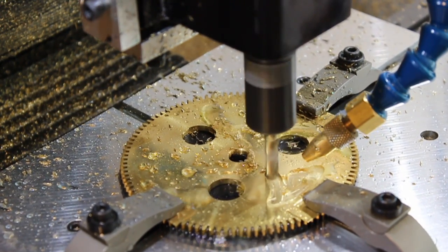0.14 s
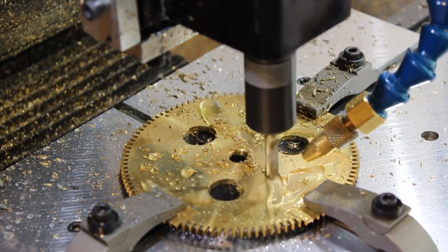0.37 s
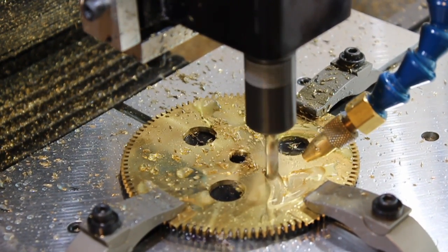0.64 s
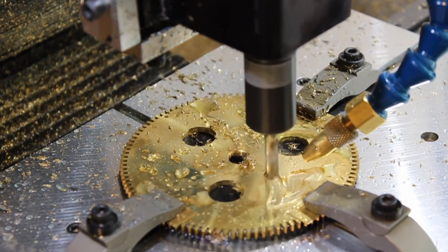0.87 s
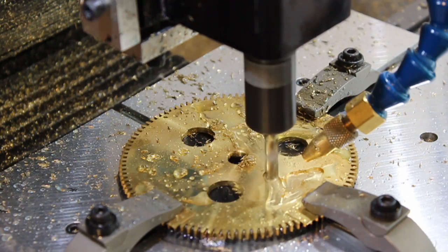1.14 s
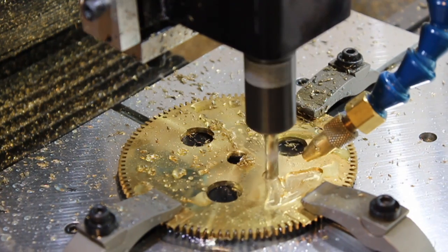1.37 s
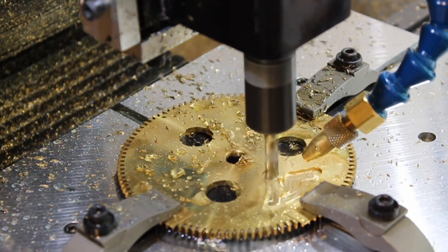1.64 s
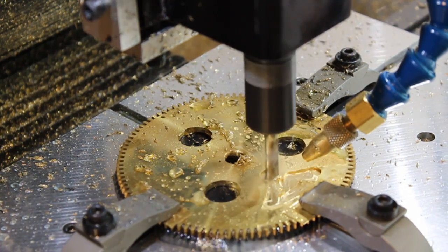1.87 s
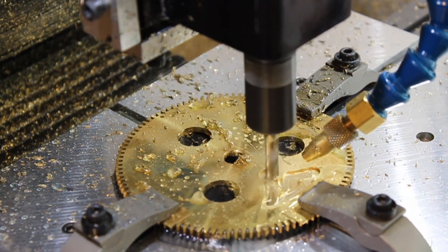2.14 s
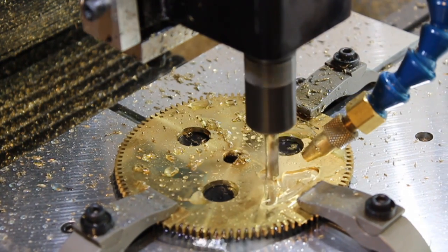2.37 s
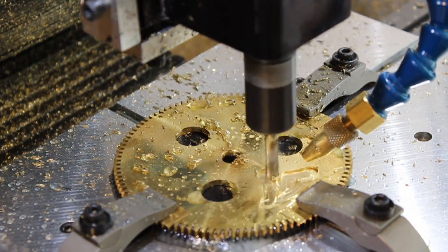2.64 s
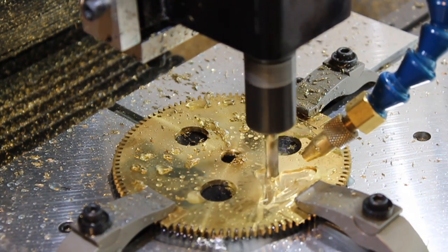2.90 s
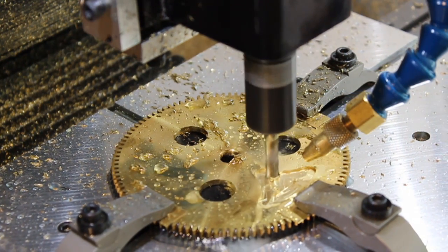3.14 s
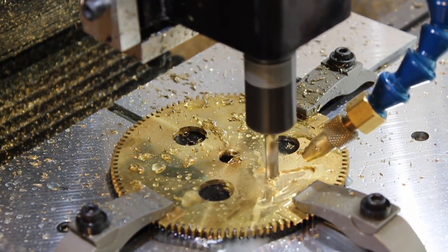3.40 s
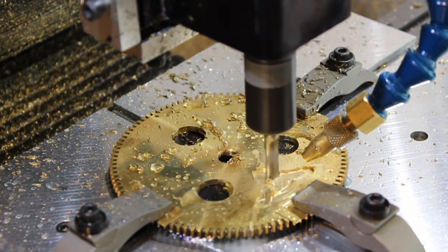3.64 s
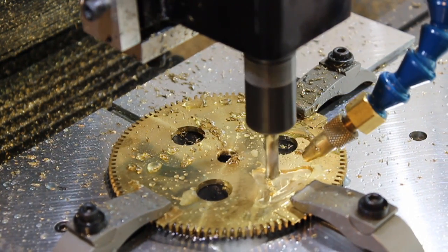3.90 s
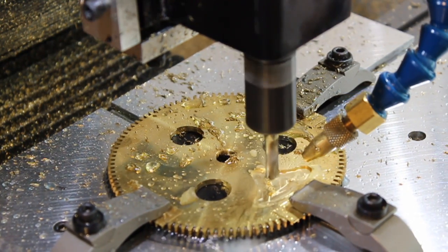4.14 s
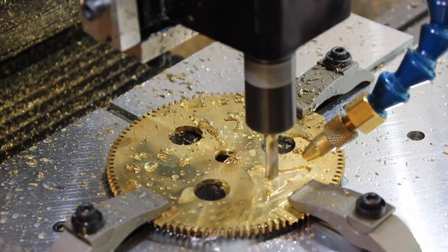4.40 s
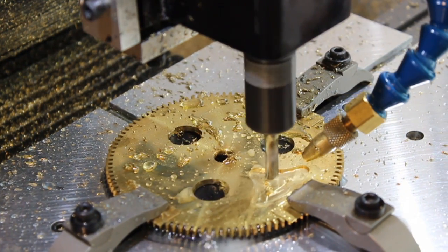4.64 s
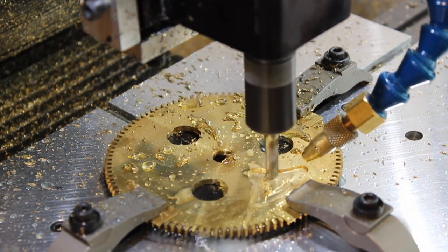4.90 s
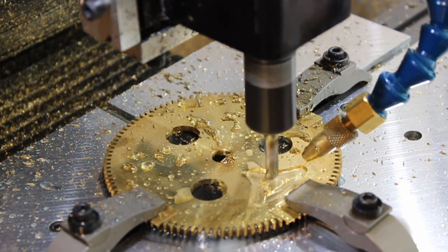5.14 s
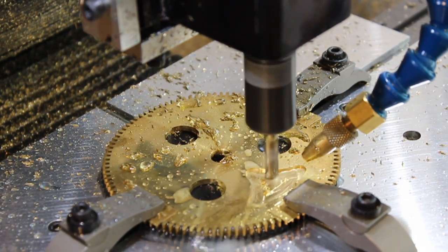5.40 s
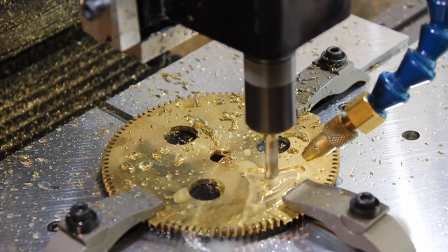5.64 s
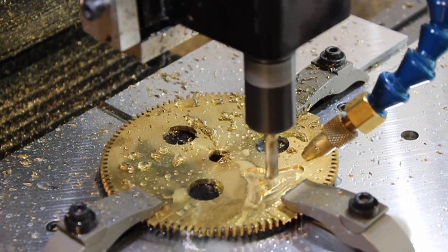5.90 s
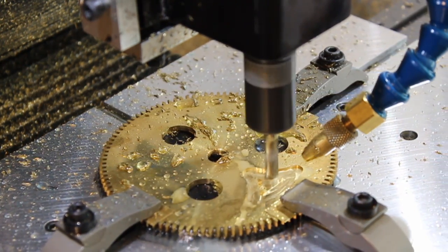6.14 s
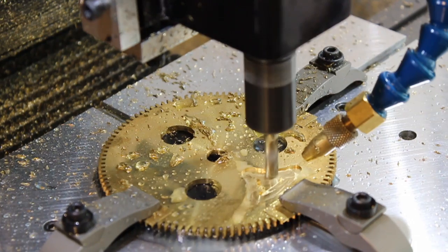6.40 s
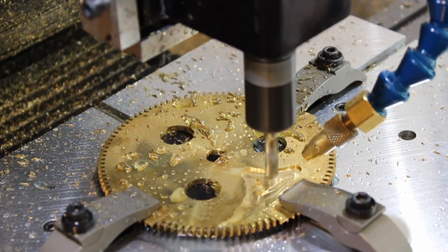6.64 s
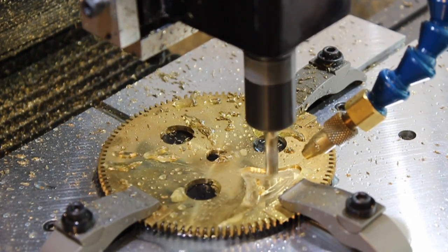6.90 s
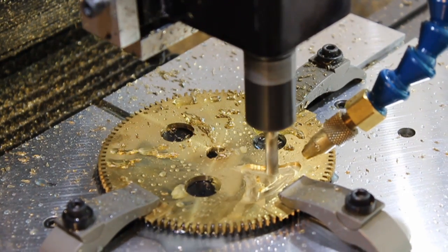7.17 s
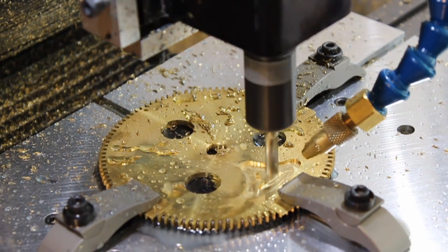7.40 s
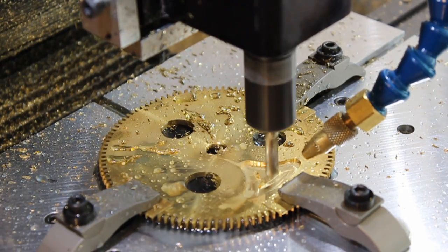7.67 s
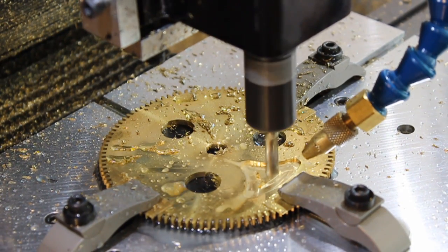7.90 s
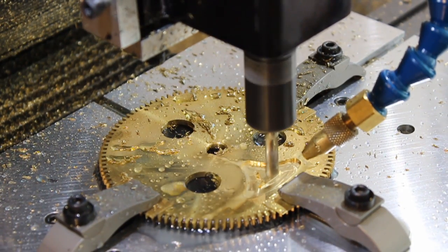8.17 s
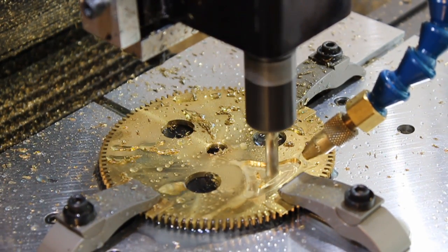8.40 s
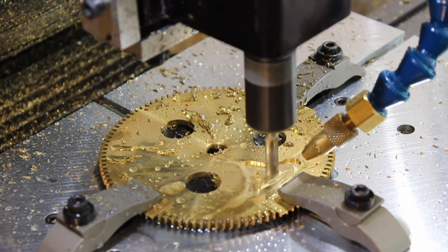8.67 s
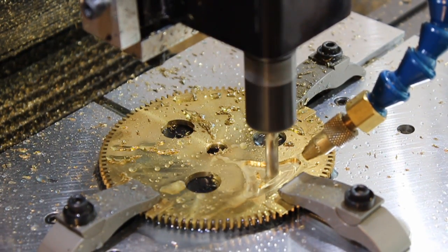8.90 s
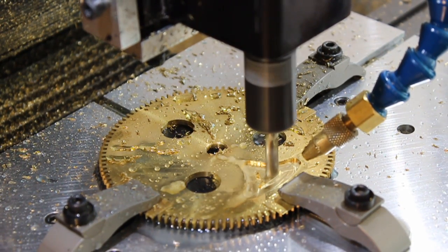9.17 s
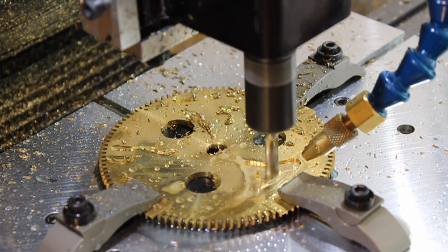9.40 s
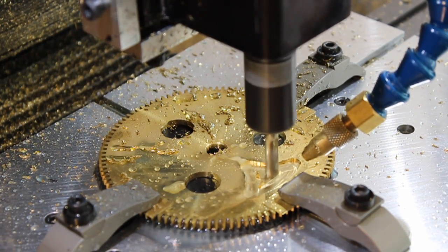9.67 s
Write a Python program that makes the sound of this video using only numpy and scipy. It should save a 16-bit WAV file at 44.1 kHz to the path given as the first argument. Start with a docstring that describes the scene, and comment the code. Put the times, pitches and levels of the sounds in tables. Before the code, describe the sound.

A strong, bright air jet hisses constantly close to the microphone, finely fluttered by a spinning cutter. Under it the cutter drums rapidly on brass, bites harder early on, then weakens while thin feed-motor whines sing. Cutting fades past the middle; short electronic-sounding motor chirps follow, then a faint low steady tone. Compressor hum and workshop rumble remain throughout, mono with slight small-room reflections.

```python
"""A four-flute end mill cuts a clamped brass wheel close to a mono microphone, in a hissing air jet chopped by
the flutes and coloured by clamps and plate; a compressor throbs and the workshop rumbles throughout. The tool
enters solid metal at 0.64 s and each flute's blow drums on the machine frame. From 2.95 s two feed motors whine
along an arc while the cut weakens, fading out by 6.6 s; short feed moves chirp from 6.55 s, and from 7.7 s a
slow steady creep sings under the jet. Motors and compressor are sines, jet and rumble are shaped noise."""
import sys
import numpy as np
from scipy import signal
from scipy.fft import rfft, irfft, next_fast_len
from scipy.io import wavfile
from scipy.ndimage import uniform_filter1d, map_coordinates

SR = 44100
rng = np.random.default_rng(int(sys.argv[2]) if len(sys.argv) > 2 else 0)


def voltage_ratio(decibels):
    """Convert decibels (scalar or array-like) to amplitude ratios, 20 dB per decade."""
    exponent = np.asarray(decibels, float) / 20
    return 10 ** exponent


def output_pcm(signal):
    """Save a mono or channel-first signal as 16-bit PCM at the path in sys.argv[1].

    Samples are clipped to [-1, 1] before scaling.
    """
    pcm = np.clip(np.atleast_2d(signal).T, -1, 1) * 32767
    wavfile.write(sys.argv[1], SR, np.round(pcm).astype(np.int16))


N = 431717
TIME = np.arange(N) / SR

# background rumble, relative spectrum: frequency_hz, density_db_per_hz
RUMBLE_COLOUR = [(25, -26), (50, -20), (90, -2), (160, -4), (300, -3.5), (600, -4.5), (1000, 1.5),
                 (1400, 0.5), (2000, -0.5), (3000, -14.5)]
# background rumble over time: time_s, level_db
RUMBLE_LEVEL = [(0, -42.5), (5.8, -44), (6.4, -46), (7.2, -42), (8.6, -43), (9.79, -43.5)]
# compressor overtones: multiple_of_stroke_rate, level_db
COMPRESSOR_OVERTONES = [(2, -59.0), (3, -72.0), (4, -66.0), (5, -73.0), (6, -62.0), (7, -77.0), (8, -61.0),
                        (9, -66.0), (10, -62.0), (11, -61.0), (12, -55.0), (13, -58.0), (14, -68.0),
                        (15, -66.0), (16, -71.0), (17, -62.0), (18, -58.0), (19, -68.0), (20, -65.0),
                        (21, -73.0), (22, -74.0), (23, -75.0), (24, -63.0), (25, -71.0), (26, -59.0),
                        (27, -67.0), (28, -52.0), (29, -53.0), (30, -62.0), (31, -61.0), (32, -47.0),
                        (33, -62.0), (34, -65.0), (35, -65.0), (36, -64.0), (37, -62.0), (38, -62.0),
                        (39, -59.0), (40, -55.0), (41, -64.0), (42, -62.0), (43, -62.0), (44, -61.0),
                        (45, -57.0), (46, -56.0), (47, -53.0), (48, -73.0), (49, -64.0), (50, -61.0),
                        (51, -71.0), (52, -59.0), (53, -57.0), (54, -61.0), (55, -65.0), (61, -61.0),
                        (64, -62.0)]
# mains hum: frequency_hz, level_db
MAINS_HUM = [(240, -64.5), (360, -63), (599.5, -60)]
# short feed moves at even acceleration, before the slides ring:
# start_s, length_s, from_step_rate_hz, to_step_rate_hz, level_db
FEED_MOVES = [(6.555, .055, 230, 280, -44), (6.615, .055, 1080, 1400, -43), (6.765, .05, 1320, 1060, -42),
              (6.915, .13, 250, 1260, -42), (7.15, .06, 230, 280, -43), (7.22, .07, 590, 615, -52),
              (7.455, .18, 1300, 40, -43), (7.655, .04, 1050, 1300, -45)]
# spindle, slowed by heavy cuts: time_s, speed_turns_per_s, chop_share (of the jet, by each flute, 0-1)
SPINDLE_RUN = [(0, 31.99, .07), (.6, 31.97, .08), (.85, 31.58, .1), (1.3, 31.92, .14), (1.75, 32.18, .17),
               (2.1, 32.15, .18), (2.65, 31.9, .18), (2.95, 31.65, .15), (3.3, 32.36, .19), (3.6, 32.5, .2),
               (5.05, 32.64, .2), (6.25, 32.74, .17), (7.3, 32.78, .12), (9.79, 32.86, .12)]
# the cut, relative levels: time_s, force_db, low_modes_db, high_modes_db
CUT_FORCE = [(0, -43.5, -9, 0.5), (.61, -45, -4, 1), (.68, -38.5, -2, 1), (.9, -42, 6, 2.5),
             (1.27, -42, 3, -1.5), (1.36, -43.5, -7, 7), (1.47, -43, -3, 4), (1.6, -44.5, -3, -1.5),
             (1.95, -46, -4, 3.5), (2.25, -45, -4, 3), (2.37, -43, -8, 2), (2.6, -44, -5.5, 2),
             (2.9, -40.5, 0, -0.5), (3.3, -45, -2, 2), (3.45, -51.5, 4, 3.5), (4.4, -49.5, -2.5, -2.5),
             (5.7, -57, 6, 1), (6.6, -90, 0, 0)]
# machine frame modes, relative levels: frequency_hz, width_hz, level_db
FRAME_MODES = [(98, 41, -14), (152.5, 36, -3.5), (188, 25, -4.5), (226.7, 23, -1.5), (254.4, 30, 0),
               (297, 38, 0.5), (490, 75, -4.5), (608, 43, -3.5), (686, 53, -2), (825, 46, -4.5),
               (1109, 58, -9), (1452, 58, -9.5)]
# air jet, relative levels: time_s, hiss_db, low_hiss_db (only its departure from its mean counts)
JET_FLOW = [(0.0, -20, -10.5), (0.11, -18.5, -10), (0.22, -19.5, -12), (0.24, -22, -11.5),
            (0.35, -19, -10.5), (1.09, -20, -11.5), (2.78, -19, -13), (4.77, -20, -12), (6.54, -19, -13.5),
            (6.71, -21, -11), (6.84, -20.5, -10), (7.09, -21, -11), (8.59, -19, -11.5), (8.61, -20.5, -13),
            (8.7, -19.5, -12), (9.76, -19.5, -13), (9.79, -18.5, -11)]
# nozzle hiss, relative spectrum: frequency_hz, density_db_per_hz
NOZZLE_COLOUR = [(300, -50), (900, -32), (1600, -23), (2500, -14.5), (4000, -11), (6500, -10), (9000, -7),
                 (11500, -.5), (13500, -4.5), (15700, -3)]
# reflections off clamps and plate lift or cancel bands of the jet:
# centre_hz, width_hz, first_position_db, second_position_db, third_position_db
FIXTURE_BANDS = [(2780, 270, -2.8, -3.1, -1.4), (3230, 460, -2.7, -1.5, 0.6), (3610, 300, 2.7, 1.9, 2.2),
                 (4340, 290, -3.4, -4.2, -1.5), (5090, 420, -0.4, -2.7, -1.3), (5450, 200, 0, 1, 3),
                 (5720, 210, 1.9, 0.7, -1.6), (6220, 220, 4.1, 4.1, 5.6), (6480, 370, 4.9, 3.2, 6.0),
                 (6710, 260, -3.0, -4.0, -3.8), (7220, 240, 1.1, -2.6, -2.9), (7460, 410, -3.8, 1.6, 5.4),
                 (8080, 350, 3.1, 4.1, 5.0), (8490, 350, 2.1, 1.5, 5.8), (8690, 180, -4.6, -4.1, -2.6),
                 (9050, 540, 2.9, 4.7, 5.5), (9540, 260, -1.6, -3.0, -1.5), (9890, 700, 3.3, 4.3, 6.2),
                 (10140, 240, -5.1, -4.6, -4.7), (10450, 160, 1, 1, 2), (10880, 290, 1.8, 1.5, 0.1),
                 (11280, 210, -1.9, -1.5, -6.6), (11690, 360, -0.9, -0.5, -7.0),
                 (12250, 370, 1.1, -1.5, -3.6), (12630, 700, -3.2, -2.7, 0.6), (13240, 520, 2.0, 0.9, 1.9),
                 (13730, 390, -3.1, 0.3, -1.9), (14600, 320, -3.4, -2.1, 1.4), (14780, 190, 2.2, 2.9, 1.3),
                 (15270, 300, 0, 1.5, 1.5)]
# when the table stands in each of those positions: time_s
TABLE_POSITIONS = [1.2, 4.8, 8.7]


def unit(x):
    """Scaled to rms 1."""
    return x / np.sqrt(np.mean(x ** 2) + 1e-20)


def curves(rows):
    """One value per sample for each column after the time."""
    time_s, *columns = np.transpose(rows)
    return [np.interp(TIME, time_s, column) for column in columns]


def wobble(rate):
    """A smooth random curve, rate knots a second."""
    knots = rng.standard_normal(int(N * rate / SR) + 4)
    return map_coordinates(knots, [TIME * rate])


def on_log_axis(points, hz):
    """(Hz, value) points joined on a log-frequency axis."""
    point_hz, values = np.transpose(points)
    return np.interp(np.log(hz + 1), np.log(point_hz), values)


def resonance(x, hz, width):
    """One damped mode, gain 1 at its centre."""
    return signal.lfilter(*signal.iirpeak(hz, hz / max(width, 5), SR), x)


def workshop():
    """Rumble of the room and the machine's bearings: noise with a shaped spectrum and a wavering level."""
    size = next_fast_len(N)
    colour = voltage_ratio(on_log_axis(RUMBLE_COLOUR, np.fft.rfftfreq(size, 1 / SR)))
    rumble = irfft(rfft(rng.standard_normal(size)) * colour, size)[:N]
    level_db = curves(RUMBLE_LEVEL)[0] + 0.87 * wobble(2.29)
    return voltage_ratio(level_db) * unit(rumble)


def hum():
    """The compressor sounds exact multiples of its stroke rate, each wavering a little, beside mains hum."""
    stroke_hz = 28.3045
    lines = [(multiple * stroke_hz, db) for multiple, db in COMPRESSOR_OVERTONES] + MAINS_HUM
    step = 64  # samples that share one gain
    slow_s = np.arange(0, N + step, step) / SR
    out = np.zeros(N)
    for hz, db in lines:
        waver = map_coordinates(rng.standard_normal(size=40), [slow_s * 3], order=3)
        gain = np.repeat(voltage_ratio(db + .8 * waver), step)[:N]
        out += np.sqrt(2) * gain * np.sin(2 * np.pi * (hz * TIME + rng.random()))
    return out


def whine(start, end, hz, db):
    """A motor sings a sine at its step rate hz between two times."""
    fade_s = min(.15, .2 * (end - start))
    span = (TIME > start) & (TIME < end)
    t = TIME[span]
    fade = np.clip(np.minimum(t - start, end - t) / fade_s, 0, 1)
    turns = np.cumsum((hz * np.ones(N))[span]) / SR
    out = np.zeros(N)
    out[span] = np.sqrt(2) * fade * voltage_ratio(db) * np.sin(2 * np.pi * turns)
    return out


def slide_ring(x, hz, width, db):
    """The slides ring with the steps in one damped mode."""
    return voltage_ratio(db) * resonance(x, hz, width)


def feed_motors():
    """Arc, short moves and creep sing at their step rates; the sine axis and the moves ring the slides."""
    start_s, end_s = 2.95, 6.55
    path_hz = 1177  # step rate along the arc
    angle = .471 + .0815 * (TIME - start_s)  # rad, turning in rad per s
    cosine_axis = whine(start_s, end_s, path_hz * np.cos(angle), db=-50.5)
    sine_axis = whine(start_s, end_s, path_hz * np.sin(angle), db=-51)

    moves = np.zeros(N)
    for start, length, from_hz, to_hz, db in FEED_MOVES:
        glide_hz = np.interp(TIME, [start, start + length], [from_hz, to_hz])
        moves += whine(start, start + length, glide_hz, db)

    rung = slide_ring(moves, hz=255, width=36, db=-2)
    rung += slide_ring(moves + sine_axis, hz=607, width=22, db=0)
    rung += slide_ring(moves, hz=1010, width=260, db=-.5)

    creep_s, past_end_s = 7.7, TIME[-1] + 1  # the creep is still running at the end
    creep = whine(creep_s, past_end_s, 146.9, db=-57.5) + whine(creep_s, past_end_s, 293.8, db=-61)
    return cosine_axis + rung + creep


def cutting(turns):
    """One blow per flute, plus chip noise that decays over each turn, rings the modes of the frame."""
    force_db, thud_db, rattle_db = curves(CUT_FORCE)
    ragged = np.clip(.2 + .04 * (force_db + 45), 0, 1)  # share of chip noise, growing with the force
    flute = np.floor(4 * turns).astype(int)
    scatter = rng.standard_normal(flute[-1] + 1)[flute]
    strikes = (np.diff(flute, prepend=flute[0]) > 0) * voltage_ratio(5.3 * ragged * scatter)
    chips = np.exp(-2.5 * (turns % 1)) * rng.standard_normal(N)
    bite = unit(chips) * np.sqrt(ragged)

    def blows(short):
        """The tool runs slightly out of true: three shorter flutes push by short against the longest."""
        return unit(strikes * np.where(flute % 4 == 0, 1, short)) * np.sqrt(1 - ragged)

    # the work springs back against the shorter flutes until the tool enters solid metal at 0.64 s
    middle = blows(np.where(TIME < .64, -.58, .25)) + bite
    outer = blows(.08) + bite  # lowest and high modes follow mostly the longest flute
    out = np.zeros(N)
    for k, (hz, width, db) in enumerate(FRAME_MODES):
        low, high = hz < 210, hz > 400
        blow = outer if low or high else middle
        drive = blow * voltage_ratio(force_db + thud_db * low + rattle_db * high + db + 23.5)
        out += (-1) ** k * resonance(drive, hz, width)  # neighbouring modes swing in opposite sense
    no_deep_bass = signal.butter(2, 70, 'high', fs=SR, output='sos')  # the frame radiates none
    return signal.sosfilt(no_deep_bass, out)


def room(x, t60=.3, wet_db=-8):
    """Walls and bench smear the knocks with a short tail of decaying noise."""
    t = np.arange(SR // 2) / SR
    tail = rng.standard_normal(len(t)) * voltage_ratio(-60 * t / t60) * (t > .004)
    return x + voltage_ratio(wet_db) * signal.fftconvolve(x, tail / np.linalg.norm(tail))[:N]


def air_jet(turns, chop):
    """Turbulent hiss; each flute crossing the jet lets out a puff, and gusts and oil-mist spits roughen it."""
    gusts_db = .5 * wobble(6)  # the air supply wavers
    gusts_db += .24 * wobble(14) + .56 * wobble(45) + .17 * wobble(160) + .41 * wobble(600)
    noise = rng.standard_normal(N) * voltage_ratio(gusts_db)
    puffs = chop * np.cos(8 * np.pi * turns) + .04 * np.cos(2 * np.pi * turns)  # per flute, per turn
    hz, t, (hiss, chopped) = signal.stft([noise, noise * puffs], SR, nperseg=1024)
    low = np.clip((7000 - hz) / 2000, 0, 1)[:, None]  # the lower hiss comes from the nozzle itself
    hiss = hiss + (1 - .55 * low) * chopped  # so it is chopped less

    hiss_db, low_db = [np.interp(t, TIME, curve) for curve in curves(JET_FLOW)]
    flow_db = hiss_db + low * (low_db - low_db.mean())

    centre, width, *lifts = np.transpose(FIXTURE_BANDS)
    bands = np.exp(-4 * np.log(2) * ((hz[:, None] - centre) / width) ** 2)
    # cross-fade as the table travels
    shift = np.array([np.interp(t, TABLE_POSITIONS, row) for row in np.eye(3)])
    colour_db = on_log_axis(NOZZLE_COLOUR, hz)[:, None] + bands @ np.transpose(lifts) @ shift

    patches = uniform_filter1d(rng.standard_normal(hiss.shape), 5, 0)
    patches = unit(uniform_filter1d(patches, 20, 1))
    # narrow, lasting: echoes from the workshop
    ripples = unit(uniform_filter1d(rng.standard_normal(hiss.shape), 150, 1))
    hiss = hiss * voltage_ratio(colour_db + flow_db + .7 * patches + 1.35 * ripples + 7.5)
    return signal.istft(hiss, SR, nperseg=1024)[1][:N]


def scene():
    """All sources reach one microphone, heard alike on both channels."""
    speed, chop = curves(SPINDLE_RUN)
    turns = np.cumsum(speed) / SR
    mono = workshop() + hum() + feed_motors() + room(cutting(turns)) + air_jet(turns, chop)
    return np.array([mono, mono])


def band_limit(x):
    """A steep low-pass at the top of the band."""
    return signal.sosfilt(signal.butter(12, 16940, fs=SR, output="sos"), x)


def record(dry):
    """The microphone chain keeps nothing from its band limit of 15740 Hz upward."""
    size = next_fast_len(N)
    passed = np.fft.rfftfreq(size, 1 / SR) < 15740
    mix = irfft(rfft(dry, size) * passed, size)[:, :N]
    return band_limit(mix)


dry = scene()
out = record(dry)
output_pcm(out)
```